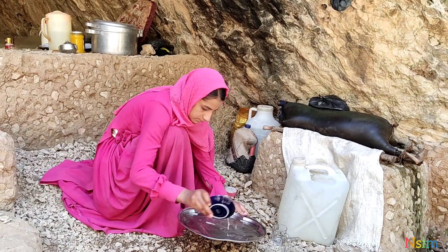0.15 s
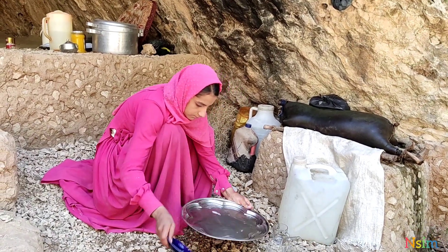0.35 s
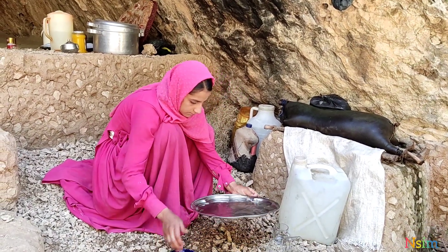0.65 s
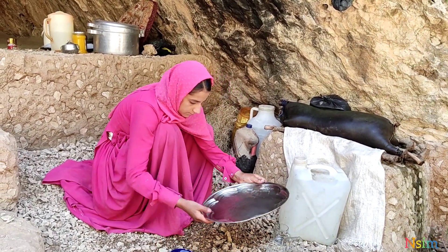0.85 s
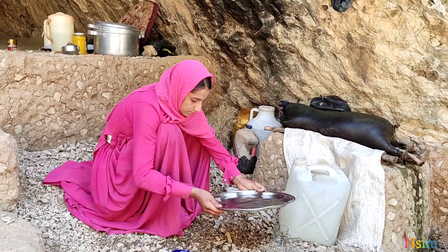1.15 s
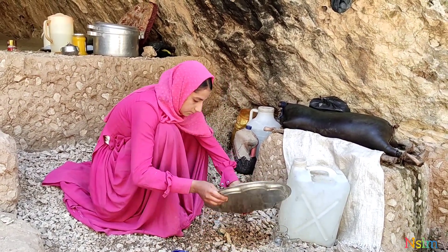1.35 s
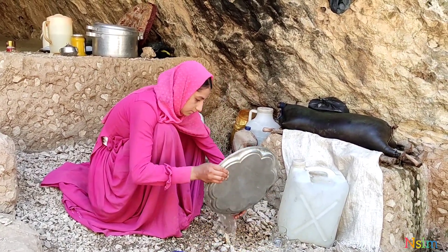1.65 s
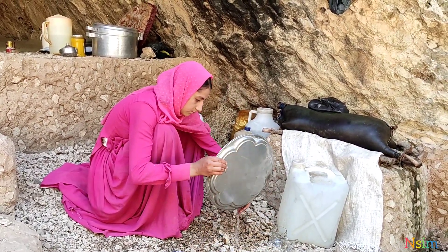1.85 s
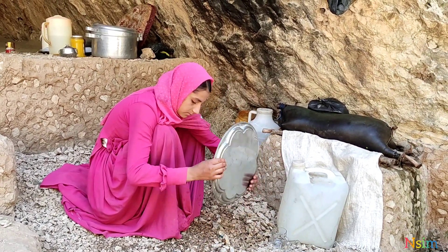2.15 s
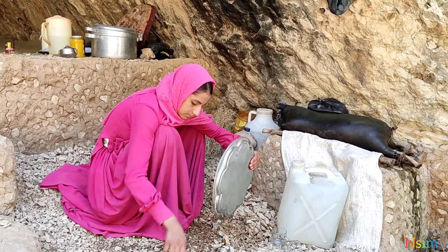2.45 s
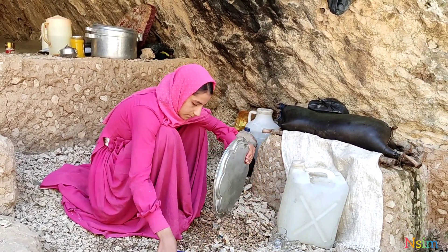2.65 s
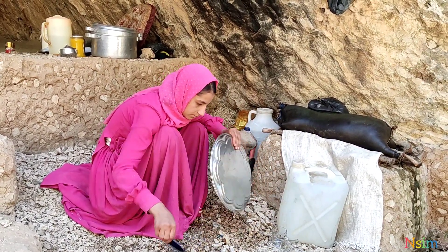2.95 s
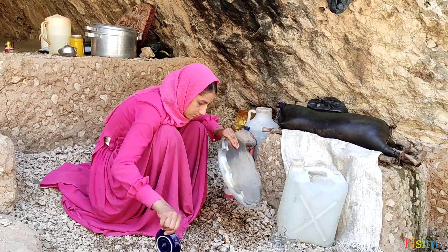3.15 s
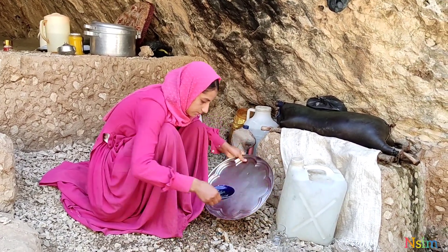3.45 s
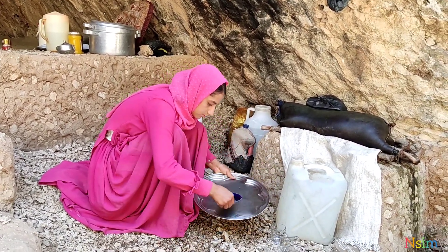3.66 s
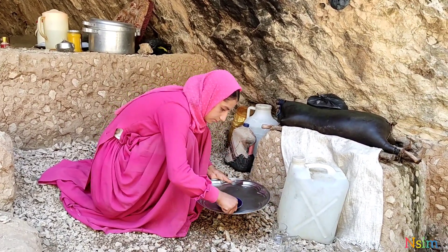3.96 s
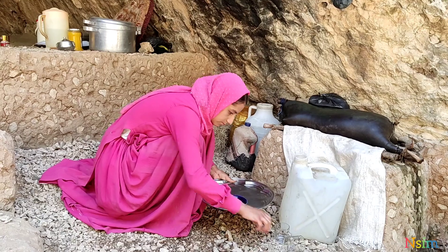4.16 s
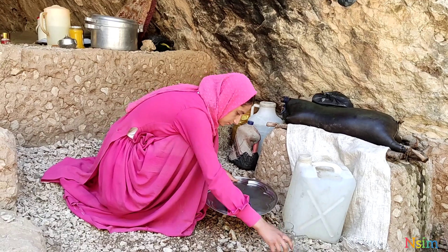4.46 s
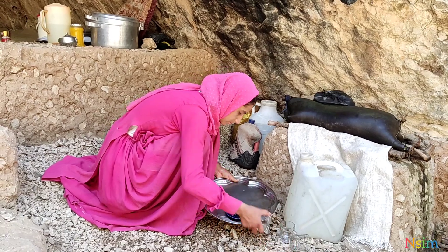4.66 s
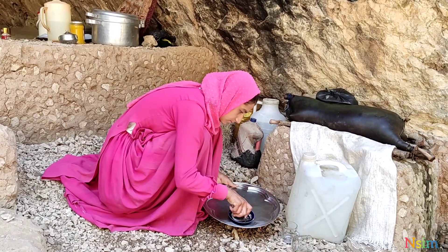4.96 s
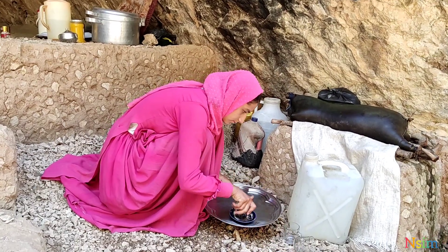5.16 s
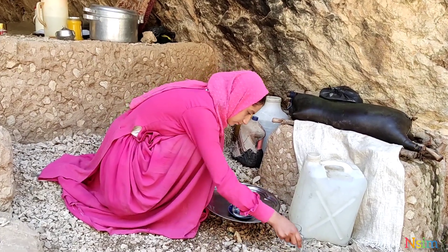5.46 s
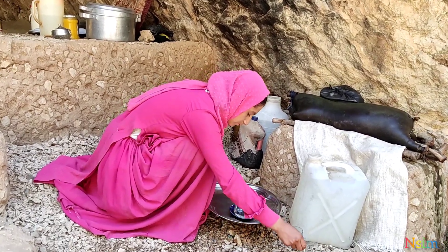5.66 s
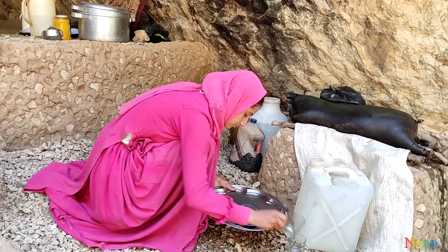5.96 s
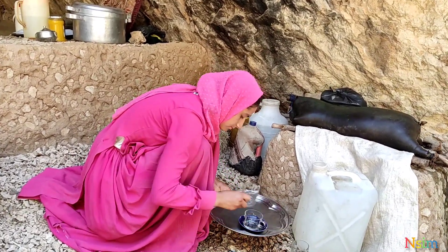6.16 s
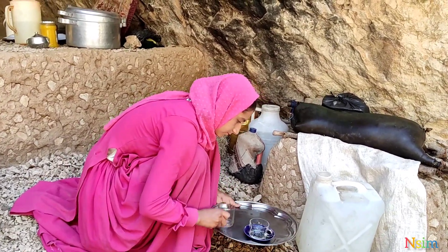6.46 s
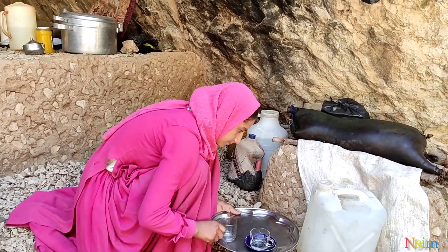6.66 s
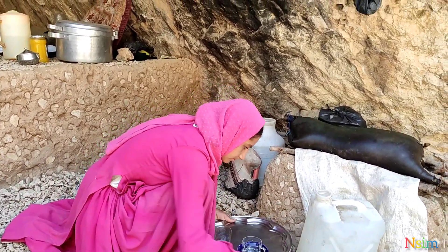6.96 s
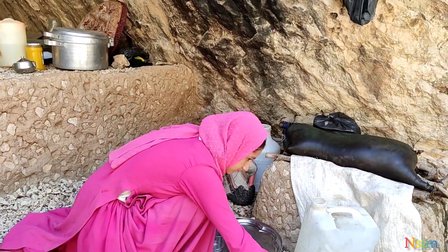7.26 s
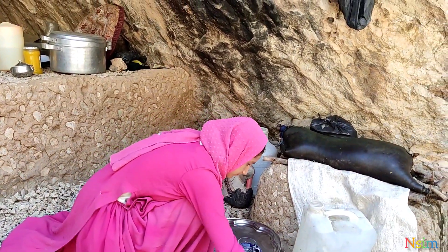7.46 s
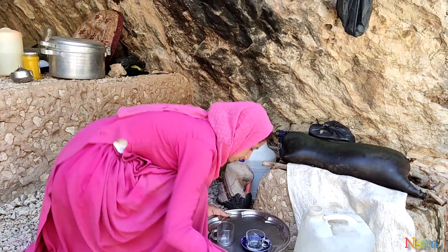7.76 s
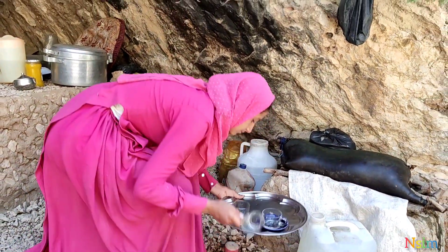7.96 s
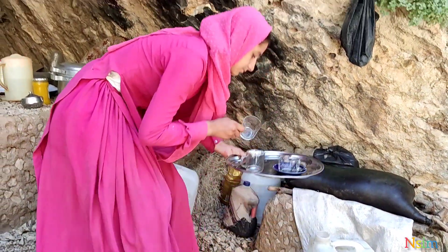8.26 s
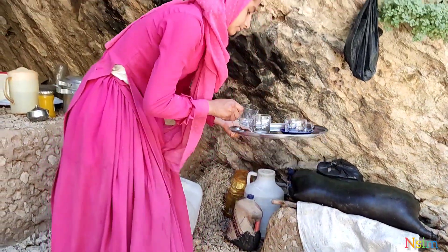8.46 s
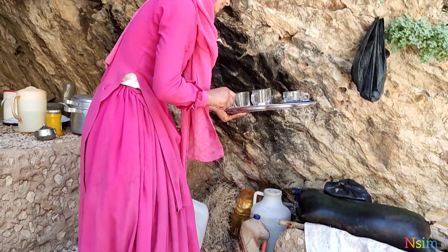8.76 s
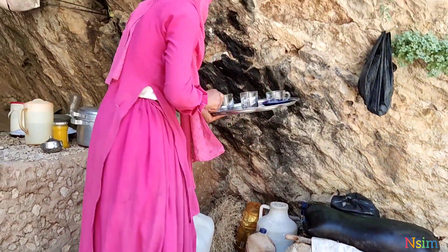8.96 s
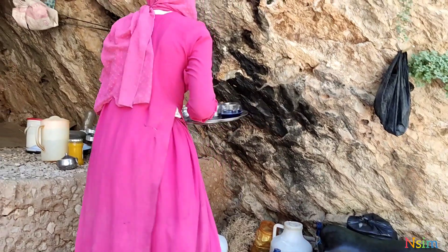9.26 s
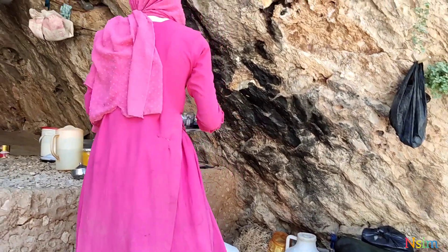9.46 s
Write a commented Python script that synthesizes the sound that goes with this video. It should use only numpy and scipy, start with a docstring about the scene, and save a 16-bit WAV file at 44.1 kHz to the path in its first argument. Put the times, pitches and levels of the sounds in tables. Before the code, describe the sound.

A china saucer scrapes and clinks on a thin tray, water patters onto stones, dishes are set down sharply, and clothing rustles while rising.

```python
"""Rinsing a tray under a rock wall

Someone crouching on gravel under a rock wall rinses a thin metal tray, tips the water off, sets a saucer
and tea glasses on it and stands up. China and tray ring as sums of decaying modes, the tray also chatters
as filtered noise; short ticks and a plastic can are brief resonances with a noisy crack. Cloth, gravel
and running water are grainy noise; far hiss and light wind rumble on the microphones lie behind."""
import sys
import numpy as np
from scipy import signal
from scipy.io import wavfile

SR = 44100
rng = np.random.default_rng(int(sys.argv[2]) if len(sys.argv) > 2 else 0)


def how_loud(loudness_db):
    """Turn decibels into a plain amplitude multiplier (0 dB gives 1, 20 dB gives 10)."""
    steps = np.asarray(loudness_db, float) / 20
    return 10 ** steps


def store_wav(level_fs):
    """Save 16-bit WAV to argv[1]."""
    pcm = np.round(np.clip(np.atleast_2d(level_fs), -1, 1) * 32767)
    wavfile.write(sys.argv[1], SR, pcm.T.astype(np.int16))


N = 423779   # length in samples


def rms_one(x):
    """Scale to rms 1."""
    return x / np.sqrt(np.mean(x ** 2) + 1e-20)


def at_hz(points, hz):
    """Read a spectrum on a log frequency axis."""
    points_hz, values = np.transpose(points)
    return np.interp(np.log(hz), np.log(points_hz), values)


def curve(rows):
    """Columns of a table joined by straight lines in time."""
    s, *columns = np.transpose(rows)
    return [np.interp(np.arange(N) / SR, s, column) for column in columns]


def panned(pan_db):
    """Left and right gains for a level of left over right."""
    return how_loud(np.array([pan_db / 2, -pan_db / 2]))


def add(out, s, piece):
    """Mix a piece in at time s."""
    at = round(s * SR)
    out[:, at:at + piece.shape[1]] += piece[:, :N - at]


def drift(rate_hz):
    """Slow random wander with spread 1, drawn every 40 samples."""
    r = np.exp(-80 * np.pi * rate_hz / SR)
    slow = signal.lfilter([1], [1, -2 * r, r * r], rng.standard_normal(N // 40 + 2002))
    slow = rms_one(slow[2000:])   # the filter has settled
    return np.interp(np.arange(N) / 40, np.arange(len(slow)), slow)


def grains(per_s, spread_db, smooth_share):
    """A loudness pattern of short uneven contacts over a smooth part; rms 1."""
    happens = rng.random(N) < per_s / SR
    sizes = how_loud(spread_db * np.minimum(rng.exponential(1, N), 4)) * happens
    contacts = rms_one(signal.lfilter([1], [1, -.97], sizes + 1e-18))
    return rms_one(smooth_share + contacts)


def resonator(hz, t60):
    """Denominator of a two-pole resonance, and its pole radius."""
    r = how_loud(-60 / (t60 * SR))
    return [1, -2 * r * np.cos(2 * np.pi * hz / SR), r * r], r


# How alike the two microphones hear a noise, before each source's own share.
# Each row: frequency in Hz, left-right likeness (0 to 1).
STEREO_LIKENESS = [(40, 0.23), (180, .8), (540, 0.54), (1600, 0.075), (4800, 0), (14000, 0)]
EDGES_HZ = 7 * 2 ** np.arange(0, 11.6, .5)


def bands(spectrum, pattern, alike_share):
    """Half-octave bands of stereo noise, together rms 1; yields centre Hz and band."""
    white = rng.standard_normal((2, 2, N)) * pattern
    hz = np.sqrt(EDGES_HZ[1:] * EDGES_HZ[:-1])
    gains = how_loud(at_hz(spectrum, hz))
    gains /= np.sqrt(np.sum(gains ** 2 * np.diff(EDGES_HZ)) * 2 / SR)
    for k, centre in enumerate(hz):
        band_pass = signal.butter(2, EDGES_HZ[k:k + 2], "band", fs=SR, output="sos")
        mid, side = signal.sosfilt(band_pass, white[k % 2])   # neighbours use separate noise
        alike = np.clip(alike_share * at_hz(STEREO_LIKENESS, centre), 0, 1)
        common, apart = np.sqrt((1 + alike) / 2) * mid, np.sqrt((1 - alike) / 2) * side
        yield centre, gains[k] * (common + apart * [[1], [-1]])


# Spectrum of the open air at the microphones.
# Each row: frequency in Hz, relative density in dB per Hz.
AIR_SPECTRUM = [(8, 8.5), (14, 0), (24, -14), (40, -11), (100, -18.5), (207, -29), (247, -35), (339, -22),
                (439, -32), (760, -30.5), (1070, -33), (1860, -35), (9920, -37.5), (13600, -41),
                (14900, -56)]


def air():
    """Far outdoor hiss, gently patchy; below 110 Hz the wind on the microphone ports is lumpier."""
    gust_db = 2.5 * drift(2.3)
    out = 0
    for hz, band in bands(AIR_SPECTRUM, 1, alike_share=0.28):
        patch_db = 1.9 * drift(2.4)
        out = out + band * how_loud(patch_db + gust_db / (1 + (hz / 110) ** 4))
    return how_loud(-54) * out


# Colour of the rustling. Each row: frequency in Hz, relative density in dB per Hz.
RUSTLE_SPECTRUM = [(71, -39), (120, -17), (203, -3), (322, -10), (473, 0), (590, -19), (866, -2.5),
                   (1430, -10.5), (2190, -1.5), (3280, -6), (9350, -0.5), (14000, -17.5), (14900, -27.5)]
# Movements of cloth and feet on gravel. Each row: start in seconds, length in seconds,
# level at start in dB, level at end in dB, hollow body near 1 kHz in dB.
MOVEMENTS = [(0.0, 0.3, -44.5, -60.5, -3.5), (0.245, 0.18, -51.5, -51.5, -2), (0.883, 0.18, -55, -66.5, -3),
             (2.46, 0.23, -57.5, -52.5, -2), (2.738, 0.11, -57, -66, -7), (2.847, 0.23, -53, -69, -16),
             (3.08, 0.26, -53.5, -53, -3.5), (3.342, 0.64, -59, -54, 1), (4.196, 0.16, -64, -74, 4),
             (4.353, 0.084, -59, -51, 1.5), (4.486, 0.11, -59.5, -61, 5), (4.575, .44, -54, -54.5, 10.5),
             (5.308, 0.37, -54, -52.5, 6.5), (5.76, 0.049, -49, -64.5, 8), (5.832, .02, -54, -53, 7),
             (5.898, 0.093, -59, -66.5, 14), (6.02, 0.44, -63, -66.5, 16.5), (6.382, .11, -60, -61, 14.5),
             (6.997, 0.099, -41, -52.5, -2.5), (7.092, 0.46, -49, -53.5, -1.5),
             (7.436, 0.12, -31.5, -47, -3.5), (7.535, 0.23, -42, -53, -2.5), (7.657, 0.045, -52, -37.5, -5),
             (7.801, 0.22, -51.5, -58, -0.5), (8.05, 0.34, -58, -74.5, 0), (8.274, .2, -41, -44.5, -4),
             (8.534, 0.09, -53, -57, -5), (9.104, 0.17, -54.5, -53, -0.5), (9.308, .03, -39.5, -54.5, 8.5),
             (9.495, 0.1, -57, -74, 2)]
# Water tipped off the tray onto the gravel.
# Each row: time in seconds, level in dB, hollow body near 1 kHz in dB.
POURED_WATER = [(1.53, -73, -8), (1.545, -57, -17), (1.58, -53, 0), (1.71, -43.5, 3), (1.87, -49.5, -10),
                (1.95, -55, -17), (2.04, -56, -32), (2.15, -61.5, 6), (2.23, -56.5, -1), (2.33, -67.5, -24),
                (2.43, -61, -26), (2.47, -71, -8)]
# Dull rumble below 500 Hz. Each row: time in seconds, level in dB.
RUMBLE = [(0.0, -64.5), (0.64, -72.5), (2.83, -72), (3.9, -68.5), (4.04, -64), (4.14, -74), (4.3, -64.5),
          (5.05, -76.5), (5.24, -66), (5.43, -67.5), (6.6, -71), (6.76, -53), (7.14, -64), (7.4, -71.5),
          (7.73, -62.5), (8.13, -66), (8.66, -64.5), (8.82, -59), (8.95, -66), (9.6, -67.5)]
# Where the rustling sits. Each row: time in seconds, left over right in dB.
RUSTLE_PLACE = [(0.0, -2), (0.13, 4), (0.8, -2.5), (0.91, 3), (1.66, -1.5), (3.74, 4), (3.93, 0.5),
                (5.67, 0), (6.92, -2.5), (7.0, 2.5), (9.47, 0), (9.6, 4)]
POUR_START_S, POUR_END_S = POURED_WATER[0][0], POURED_WATER[-1][0]


def rustle():
    """Fine friction grains: each movement swells and fades; water adds its own; a rumble lies below."""
    rise_s, fade_db_per_s, thud_db = 0.023, 219, -12.5
    t = np.arange(N) / SR
    pour_db, pour_body_db = curve(POURED_WATER)
    (rumble_db,), (pan_db,) = curve(RUMBLE), curve(RUSTLE_PLACE)
    power = how_loud(2 * pour_db) * ((t > POUR_START_S) & (t < POUR_END_S)) + 1e-12
    body_db = power * pour_body_db   # summed weighted by power, averaged below
    for s, length_s, start_db, end_db, hollow_db in MOVEMENTS:
        span = slice(max(round(s * SR), 0), round((s + 1) * SR))
        age = t[span] - s
        level_db = np.interp(age, [0, length_s], [start_db, end_db])
        level_db -= fade_db_per_s * np.maximum(age - length_s, 0)
        move = (how_loud(level_db) * np.clip(age / rise_s, 0, 1) ** 2) ** 2
        power[span] += move
        body_db[span] += move * hollow_db
    body_db = body_db / power

    out, low, together = 0, 0, drift(25.0)
    pattern = grains(per_s=540.0, spread_db=2.2, smooth_share=6.6)
    for hz, band in bands(RUSTLE_SPECTRUM, pattern, alike_share=0.99):
        body_share = np.exp(-(np.log2(hz / 900) / 1.2) ** 2)
        thud_share = 1 / (1 + (hz / 450) ** 4)
        band = band * how_loud(0.46 * together + 2.4 * drift(6.9))
        out = out + band * how_loud(body_db * body_share + thud_db * thud_share)
        low = low + band * thud_share
    return out * np.sqrt(power) * panned(pan_db) + rms_one(low) * how_loud(rumble_db)


def rock(x):
    """Rough rock and gravel scatter the sound back as a short diffuse tail, different at each ear."""
    t60 = 0.1
    t = np.arange(SR // 8) / SR
    tail = rng.standard_normal((2, len(t))) * how_loud(-60 * t / t60) * (1 - np.exp(-t / 0.001))
    tail /= np.sqrt(np.sum(tail ** 2) / 2)
    return how_loud(-7.5) * signal.oaconvolve(x, tail, axes=1)[:, :N]


def struck(rows, crack_db, rise_s):
    """Each contact rings one short resonance inside a wide noisy crack; the far ear hears it later."""
    out, t = np.zeros((2, N)), np.arange(SR // 8) / SR
    noises = rng.standard_normal((len(rows), 2, len(t)))
    for (s, level_db, hz, t60, pan_db), noise in zip(rows, noises):
        late_s = np.maximum(4e-5 * pan_db * np.array([[-1], [1]]), 0)
        ear_t = np.maximum(t - late_s, 0)
        ring = np.sin(2 * np.pi * hz * ear_t) * how_loud(-60 * ear_t / t60) * (1 - np.exp(-ear_t / rise_s))
        burst = noise * how_loud(-60 * ear_t / (0.64 * t60)) * (ear_t > 0)
        edges = [0.6 * hz, min(2.07 * hz, .45 * SR)]
        band_pass = signal.butter(2, edges, "band", fs=SR, output="sos")
        crack = signal.sosfilt(band_pass, burst) * np.sqrt(SR / 2 / np.diff(edges))
        add(out, s, how_loud(level_db) * panned(pan_db)[:, None] * (ring + how_loud(crack_db) * crack))
    return out


def spray(count=30):
    """Faint stray drops at random moments, pitches and sides while the water runs off."""
    when, size, pitch, side = rng.random((count, 4)).T
    s = POUR_START_S + (POUR_END_S - POUR_START_S) * when
    level_db = -53 - 2.0 * np.log(size + .02)
    return np.transpose([s, level_db, 1500 * 6 ** pitch, 16 * (side - .5)])


# Short ticks: drops, pebbles, clicks within the saucer's slide, a knock and a scuff.
# Each row: start in seconds, level in dB, pitch in Hz, left over right in dB.
SHORT_TICKS = [(0.5684, -43, 10100, -8), (.621, -31, 5540, 1.5), (.665, -33, 7660, 2), (.7, -33, 5500, 0),
               (0.8764, -37, 9940, 8.5), (0.9108, -47, 3930, 1.5), (1.286, -50, 1140, -2),
               (1.4253, -51, 1130, 10), (1.5486, -37.5, 2320, -2), (1.5813, -31, 5550, -0.5),
               (1.7194, -30, 5400, -1.5), (1.7853, -31.5, 7800, -6.5), (1.877, -39, 9400, .5),
               (1.9036, -34, 9660, 3), (1.9629, -30, 7900, 5.5), (2.015, -48, 9600, 11),
               (2.0321, -32, 5330, 8), (2.0694, -45, 2240, -1.5), (2.0857, -45, 2200, 9),
               (2.2076, -42, 8000, 2.5), (2.2225, -39, 9600, 5.5), (2.319, -46, 6750, 0.5),
               (2.364, -39.5, 4700, -11), (3.804, -43.5, 2100, -1), (4.285, -60, 1990, -14),
               (4.3036, -45, 1670, -1), (4.4392, -37, 2120, -10), (4.541, -40, 912, -13.5),
               (4.679, -39, 1190, -10), (5.5682, -37, 6000, 10.5), (5.5907, -41, 8470, 7),
               (5.6417, -30.5, 5720, 5.5), (5.667, -37, 3300, 6), (5.855, -36.5, 4750, -3),
               (5.9234, -41, 5100, 3), (5.944, -30, 9800, 8), (5.9704, -43.5, 1010, -8.5),
               (5.9858, -31.5, 7570, 9.5), (6.0222, -41.5, 5040, 3), (6.5024, -34, 8100, 7.5),
               (6.5665, -46.5, 7980, -1), (7.4515, -33, 8200, 6), (7.55, -30, 5860, 3.5),
               (8.543, -23, 9300, 1.5), (8.5629, -32, 7840, 1), (9.0306, -47, 2110, -1),
               (9.056, -43.5, 1950, -4), (9.0685, -39.5, 5900, 2), (9.0917, -40.5, 8800, 13),
               (9.1196, -39.5, 1830, 3), (9.327, -34.5, 5400, -1.5), (9.332, -46.5, 880, -1),
               (9.3926, -44, 964, -1), (9.4, -39, 934, -4.5), (9.4226, -33, 995, -7),
               (9.434, -45, 1150, -5)]


def ticks():
    """Short ticks and stray drops, each a tiny resonance that dies within milliseconds."""
    t60 = 0.0083
    rows = [(s, level_db, hz, t60, pan_db) for s, level_db, hz, pan_db in [*SHORT_TICKS, *spray()]]
    return struck(rows, crack_db=-3.0, rise_s=1e-4)


# Hollow knocks on a plastic can. Each row: start in seconds, level in dB, pitch in Hz,
# t60 in seconds, left over right in dB.
CAN_KNOCKS = [(1.42, -49, 440, 0.049, -2), (4.541, -36, 384, 0.11, 4.5), (5.683, -44, 336, 0.095, 1.5),
              (7.9, -43.5, 178, 0.041, 4)]


def knocks():
    """A plastic can gives low, softly rising resonances."""
    return struck(CAN_KNOCKS, crack_db=-7.0, rise_s=0.0021)


def rung(blows, modes, chance_db, damped_db):
    """Each blow rings the modes near its favoured pitch; a hand or the ground then damps the ring."""
    out, t = np.zeros((2, N)), np.arange(int(.4 * SR)) / SR
    lucks = rng.normal(0, 1, (len(blows), len(modes)))
    for (s, blow_db, centre_hz, octaves, free_s), luck in zip(blows, lucks):
        held = how_loud(np.maximum(-1300 * np.maximum(t - free_s, 0), damped_db - 150 * t))
        for (hz, mode_db, t60, pan_db, lag_us), chance in zip(modes, luck):
            favour_db = -6 * (np.log2(hz / centre_hz) / max(octaves, .02)) ** 2
            if favour_db > -30:
                size = how_loud(blow_db + mode_db + favour_db + chance_db * chance) * panned(pan_db)[:, None]
                rise = 1 - np.exp(-t * hz / 3)
                ear_t = t - [[lag_us / 10 ** 6], [0]]   # the left ear lags
                add(out, s, size * held * rise * how_loud(-60 * t / t60) * np.sin(2 * np.pi * hz * ear_t))
    return out


# Pitches of the saucer's modes in Hz.
SAUCER_PITCHES_HZ = [1860, 3866, 6021, 6107, 8485, 8730, 11240, 12300]
# The same modes in the same order. Each row: level in dB, t60 in seconds when ringing free,
# left over right in dB, lag of the left ear in microseconds.
SAUCER_MODES = [(-2, 0.71, -2.5, -45.5), (-9, 0.68, -1.5, 15), (-11.5, 0.61, -4.5, -12.5),
                (-4, 0.29, 0.5, -43), (-3.5, .15, 4, 30.5), (-1, 0.22, 17, 55), (-20.5, .08, 1, 22.5),
                (-7.5, 0.1, 4, -25)]
# Blows on the saucer. Each row: start in seconds, level in dB, favoured pitch in Hz,
# spread in octaves, free ring in seconds before it is damped.
SAUCER_BLOWS = [(.65, -25, 6000, 0.27, 0.0052), (.666, -40, 1900, 0.65, 0.032), (.70, -57, 1860, .2, 0.12),
                (.672, -40, 3870, .2, .03), (.688, -24.5, 3870, 0.25, 0.16), (.728, -43, 8150, 0.19, 0.043),
                (.85, -57, 8000, 0.69, .02), (2.70, -53.5, 1870, .4, 0.029),
                (2.75, -50, 1880, 0.97, 0.0076), (3.27, -53, 1870, .4, .015), (5.062, 3, 3860, 0.44, 0.016),
                (5.063, -17.5, 11600, 0.35, .015), (5.074, -9, 6180, 0.032, 0.026),
                (5.112, -17.5, 4000, 0.63, 0.004), (5.123, -14.5, 3180, 0.48, 0.021),
                (5.211, -21, 4300, 0.57, 0.027), (5.25, -17.5, 4540, 0.22, .037),
                (5.29, -33, 3830, .37, 0.054), (6.651, -37, 5850, .33, .027), (6.86, -44, 6000, .3, 0.033),
                (8.69, -48, 3870, .3, 0.13), (8.878, -38, 3870, .3, 0.012)]
# The saucer's slide across the tray. Each row: time in seconds, relative level in dB.
SAUCER_SLIDE = [(0.585, -57), (0.595, -46), (0.665, -35.5), (0.723, -53), (0.729, -36.5), (0.78, -84)]


def saucer():
    """Clinks, and a slide across the tray whose stick-slip clicks keep the modes roughly ringing."""
    modes = [(hz, *rest) for hz, rest in zip(SAUCER_PITCHES_HZ, SAUCER_MODES)]
    s, stroke_db = np.transpose(SAUCER_SLIDE)
    stroke = how_loud(np.interp(np.arange(SR) / SR, s, stroke_db, left=-200, right=-200))
    slide = np.zeros((2, SR))
    for hz, mode_db, t60, *sides in modes:
        slips = rng.standard_normal((2, SR)) * how_loud(4.7 * rng.exponential(1, SR))
        slips *= rng.random(SR) < 1500.0 / SR   # slips per second
        poles, r = resonator(hz, 0.079 * t60)   # contact with the tray shortens the ring
        ring = signal.lfilter([1, 0, -1], poles, slips * stroke + 1e-18)
        slide += ring * how_loud(mode_db - 19.0 + 5.3 * np.log2(hz / 6000))
    out = rung(SAUCER_BLOWS, modes, chance_db=1, damped_db=-28.0)
    add(out, 0, slide)
    return out


def sheet(x, t60, ring_share):
    """Thin sheet has countless close modes: one dying noise is the impulse response for every blow."""
    t = np.arange(SR // 8) / SR
    mid, side = rng.standard_normal((2, len(t))) * how_loud(-60 * t / t60)
    high_pass = signal.butter(2, 1200, "high", fs=SR, output="sos")
    modes = signal.sosfilt(high_pass, mid + 0.23 * side * [[1], [-1]])
    modes /= np.sqrt(np.sum(modes ** 2) / 2)
    ring = signal.oaconvolve(x, modes, axes=1)[:, :N]
    return np.sqrt(1 - ring_share) * x + np.sqrt(ring_share) * ring


# A hand stills the tray. Each row: start in seconds, time held in seconds.
HAND_STOPS = [(4.166, 0.095), (5.185, 0.023), (6.755, 0.016), (8.735, 0.076)]


def stilled():
    """Gain of the chatter: it sinks at 300 dB per second while a hand rests on the tray."""
    t, gain_db = np.arange(N) / SR, np.zeros(N)
    for s, held_s in HAND_STOPS:
        gain_db -= 300 * (t - s) * ((t > s) & (t < s + held_s))
    return how_loud(gain_db)


# Colour of the tray's chatter. Each row: frequency in Hz, relative density in dB per Hz.
TRAY_SPECTRUM = [(59, -47.5), (100, -21.5), (241, -13), (424, -6), (556, -14.5), (811, -1), (900, -4),
                 (1830, 0), (3360, -1.5), (4700, -1.5), (9580, -7), (13700, -22.5), (14900, -42)]
# Blows that make the tray and its load clatter. Each row: start in seconds, level in dB,
# hardness in dB per octave, t60 at 2 kHz in seconds, low flexing in dB.
TRAY_BLOWS = [(0.6486, -37.5, 1.5, 0.41, -18), (3.8569, -15, 3.5, 0.18, 9), (3.9258, -30.5, 3, 0.32, 19),
              (3.9595, -19.5, 1.5, 0.31, 5.5), (3.975, -26.5, 6, 0.24, 7), (4.0516, -26, 3, 0.59, 12.5),
              (4.1109, -35, 3, 0.2, 20.5), (5.0612, -7.5, 0, 0.19, -16.5), (5.114, -22, 2.5, 0.38, 9.5),
              (5.2092, -18.5, -2.5, 0.18, -20), (5.2476, -27.5, -3.5, 0.3, -17),
              (5.299, -33.5, 1.5, 0.11, 4), (6.5772, -25, 2, 0.36, 10.5), (6.6252, -24, 2, 0.26, 11),
              (6.6446, -26.5, -1.5, 0.42, -18), (6.704, -29.5, 1, 0.37, 6), (6.7823, -19.5, 0, 0.25, 7.5),
              (6.808, -24.5, -0.5, 0.37, -26), (6.844, -25.5, -2, 0.31, -4), (6.868, -32.5, 1, 0.59, -20),
              (7.0194, -45, 5, 0.051, 16), (8.64, -20.5, 1.5, 0.35, 6.5), (8.6883, -42, -4.5, 0.18, 12),
              (8.817, -45.5, -2.5, 0.53, -1.5), (8.837, -41.5, 3, 0.51, 20), (8.879, -37.5, -4, 0.17, -11),
              (8.9446, -45, -2.5, 0.1, -5), (9.3904, -44, 2.5, 0.12, 6.5), (9.421, -45.5, -2, 0.23, -4)]


def chatter():
    """Dense noise of thin sheet metal that dies faster in the treble; hard blows tilt it brighter."""
    out, t = 0, np.arange(SR // 2) / SR
    pattern = grains(per_s=550.0, spread_db=1.9, smooth_share=3.6)
    for hz, band in bands(TRAY_SPECTRUM, pattern, alike_share=1.5):
        power = np.zeros((2, N))
        slow = (hz / 2000) ** -.15   # lows start later and last longer
        low_share = 1 / (1 + (hz / 600) ** 2)
        for s, blow_db, hardness, t60, flex_db in TRAY_BLOWS:
            rise = (1 - np.exp(-t / (0.00059 * slow ** 3))) ** 2
            shape = np.exp(-2 * np.log(1000) * t / (t60 * slow)) * rise
            level_db = blow_db - 7.5 + hardness * np.log2(hz / 2500) + flex_db * low_share
            add(power, s, shape * how_loud(level_db) ** 2 * np.ones((2, 1)))   # centred
        out = out + band * np.sqrt(power)
    return sheet(out * stilled(), t60=.05, ring_share=.35)


# Modes of the tray and its glasses.
# Each row: frequency in Hz, level in dB, t60 in seconds when ringing free.
TRAY_MODES = [(161.8, -1.5, .3), (245, -3.5, 0.32), (290, -19, 0.22), (392, 0, 0.14), (433.7, 0.5, 0.18),
              (645, -8, 0.14), (815, 1, 0.11), (1015, -7.5, .15), (1104, -10, .12), (1580, -5.5, 0.11),
              (1670, 2, 0.12), (1773, 1, .2), (1900, 0, 0.12), (1990, -14, 0.15), (2230, -8.5, .12),
              (2372, -5, 0.15), (2680, -6, 0.046), (3410, -5.5, 0.28), (4026, 4, 0.05), (4390, -5.5, 0.13),
              (4770, -4, .1), (4815, -14, 0.32), (4870, -4, 0.074), (5500, -6.5, 0.18), (7900, -4, 0.045),
              (8020, -5.5, 0.098), (8044, 0, 0.098), (8660, 1, 0.039)]
# Single pitches of tray or glass that stand out, many of them within a blow above.
# Each row: start in seconds, level in dB, pitch in Hz, free ring in seconds.
CLEAR_RINGS = [(3.859, -26, 7550, .033), (3.86, -30.5, 810, 0.062), (3.958, -40, 245, .15),
               (3.975, -31, 815, .05), (4.11, -34.5, 790, 0.01), (4.112, -40, 424, 0.046),
               (5.063, -10, 2230, 0.004), (5.099, -48, 425, .17), (5.212, -22, 4815, .006),
               (5.249, -28, 4815, 0.067), (5.255, -27, 2372, 0.016), (5.272, -27.5, 2372, .018),
               (5.307, -30, 1104, 0.013), (6.579, -31.5, 826, 0.015), (6.581, -22, 4390, 0.0062),
               (6.583, -32, 1900, 0.021), (6.622, -23, 4420, 0.022), (6.784, -18, 957, 0.022),
               (6.785, -21, 4580, 0.034), (6.79, -45, 1900, .06), (6.875, -35, 1900, 0.056),
               (8.642, -34, 1600, 0.032), (8.665, -32, 1600, 0.044), (8.65, -43, 860, .025),
               (8.675, -40, 390, .04), (8.705, -47.5, 428, .14), (8.785, -53, 420, .05),
               (8.84, -48, 200, .08), (8.936, -51, 1580, 0.048), (8.859, -43.5, 1580, .08)]


def tray():
    """The chatter drives every mode of tray and glasses; blows ring them too, and single pitches stand out."""
    noise, colour = chatter(), 0
    for hz, mode_db, t60 in TRAY_MODES:
        poles, r = resonator(hz, 0.19 * t60)
        zeros = np.array([1, 0, -1]) * (1 - r * r) / 2   # peak gain 1
        colour = colour + how_loud(mode_db - 2.0) * signal.lfilter(zeros, poles, noise + 1e-18)
    # every blow rings the upper modes, damped from the start, and the flexing modes, left free
    rings = [(s, blow_db - 20.5, 2502.5, 1.5, -0.36) for s, blow_db, *rest in TRAY_BLOWS]
    rings += [(s, blow_db + flex_db - 30.5, 293, 1, 3.6) for s, blow_db, *rest, flex_db in TRAY_BLOWS]
    rings += [(s, ring_db, hz, 0.089, free_s) for s, ring_db, hz, free_s in CLEAR_RINGS]
    modes = [(*mode, -1.5, 30.0) for mode in TRAY_MODES]   # a little to the right
    return noise + colour + rung(rings, modes, chance_db=1.5, damped_db=-13.0)


def scene():
    """All sources at the microphones; saucer, ticks and knocks also scatter off the rock."""
    sharp = saucer() + ticks() + knocks()
    return sharp + rock(sharp) + tray() + rustle() + air()


def band_limit(x):
    """A steep low-pass at the top of the band."""
    return signal.sosfilt(signal.butter(12, 15010, fs=SR, output="sos"), x)


def record(dry):
    """A ground reflection cancels part of a band, peaks are rounded and the top is cut."""
    dip_hz, dip_width_hz, dip_share = 3300, 460, 0.3
    peak = signal.iirpeak(dip_hz, dip_hz / dip_width_hz, fs=SR)
    dipped = dry - dip_share * signal.lfilter(*peak, dry)
    rounded = np.tanh(dipped)
    low_pass = signal.cheby2(10, 40, 14200 * 1.05, fs=SR, output="sos")   # 40 dB down at this edge in Hz
    return band_limit(signal.sosfilt(low_pass, rounded))


dry = scene()
out = record(dry)
store_wav(out)
```